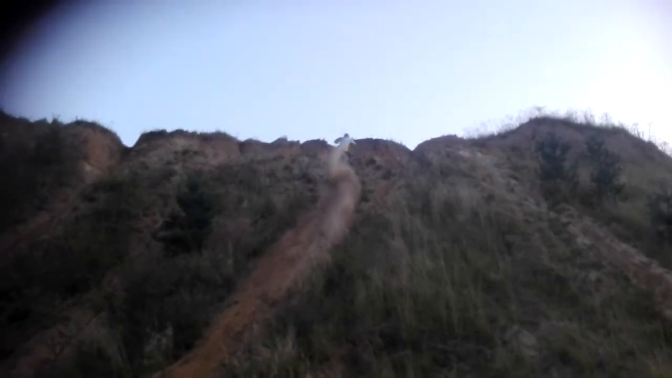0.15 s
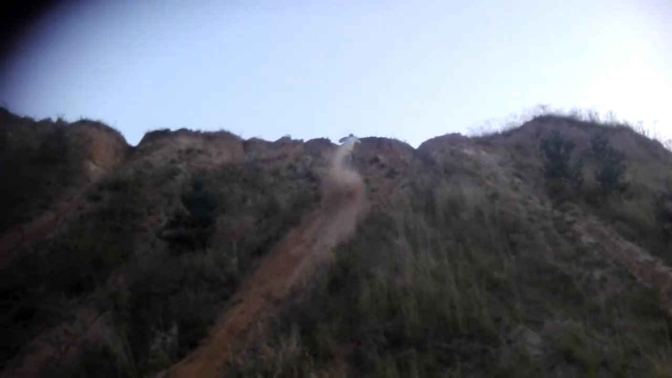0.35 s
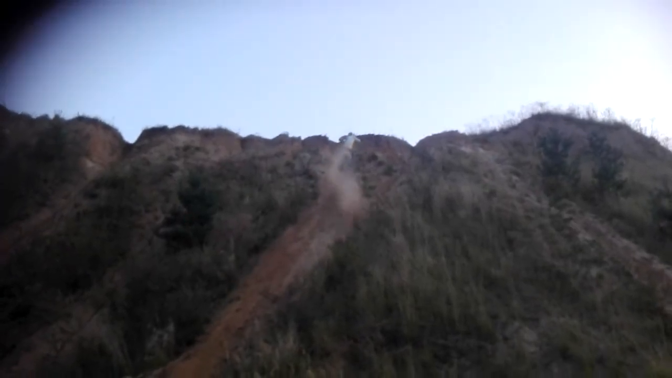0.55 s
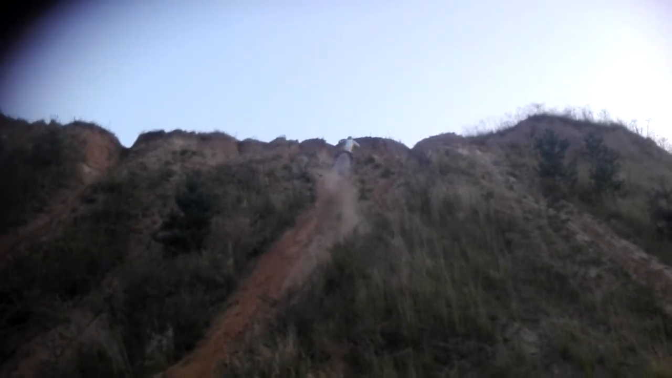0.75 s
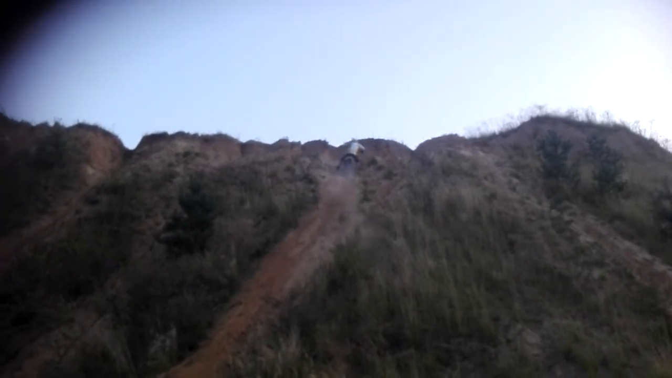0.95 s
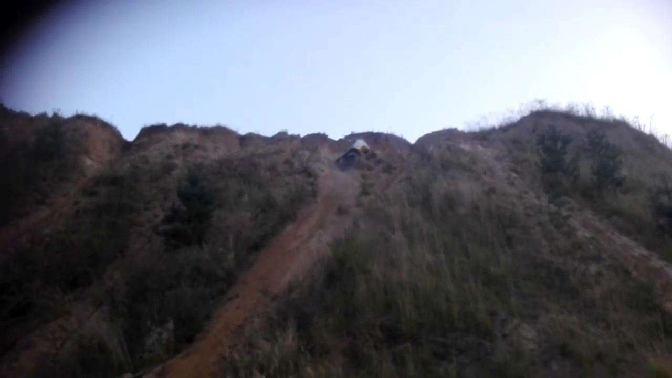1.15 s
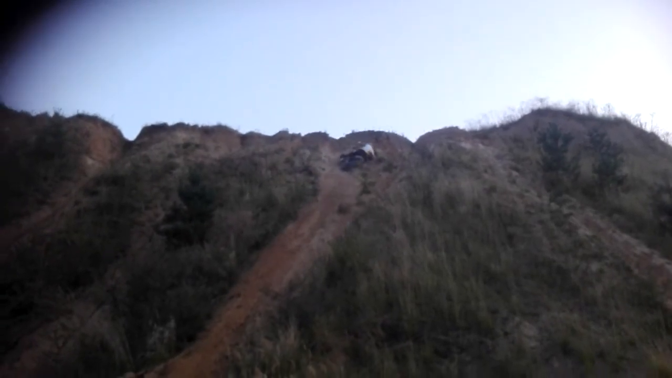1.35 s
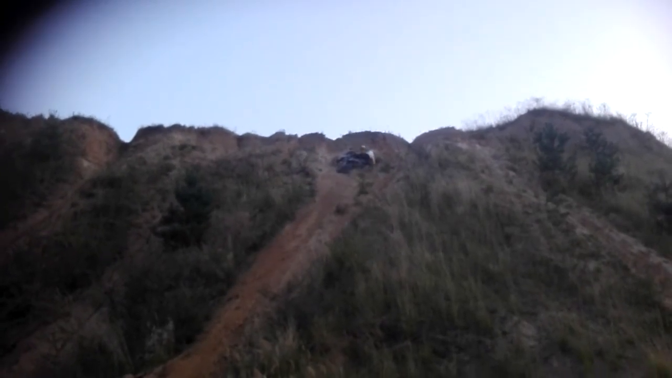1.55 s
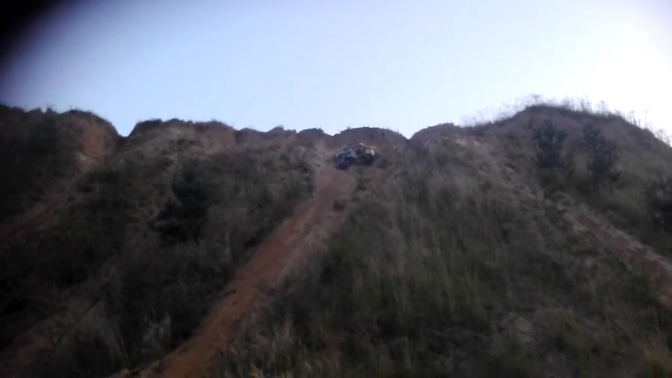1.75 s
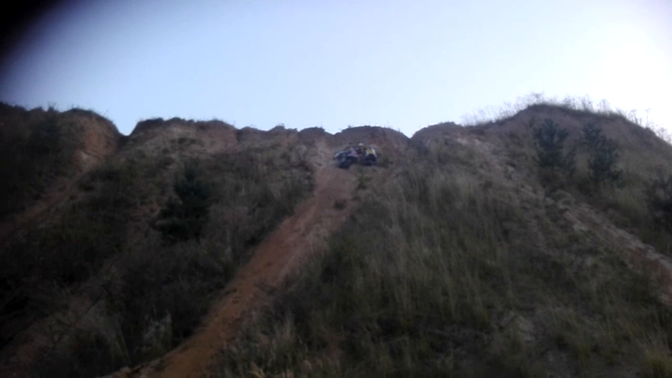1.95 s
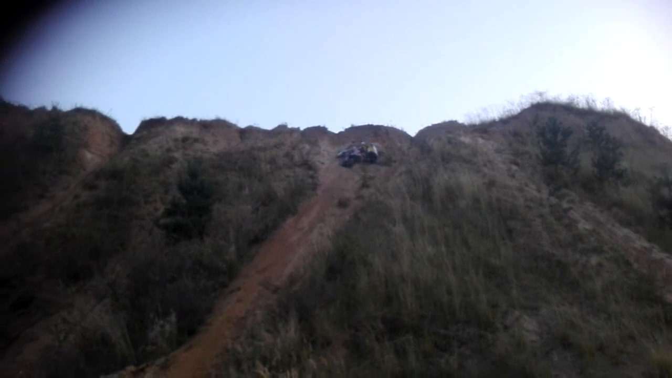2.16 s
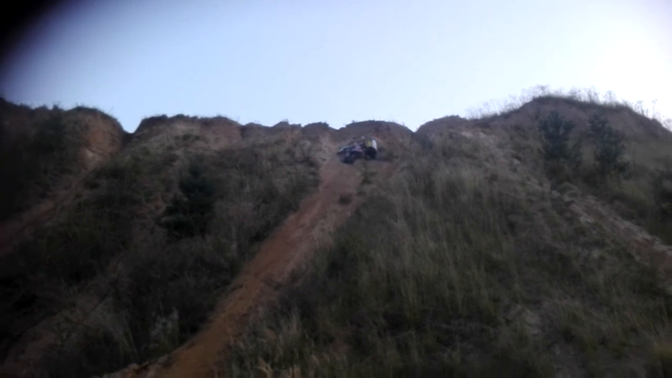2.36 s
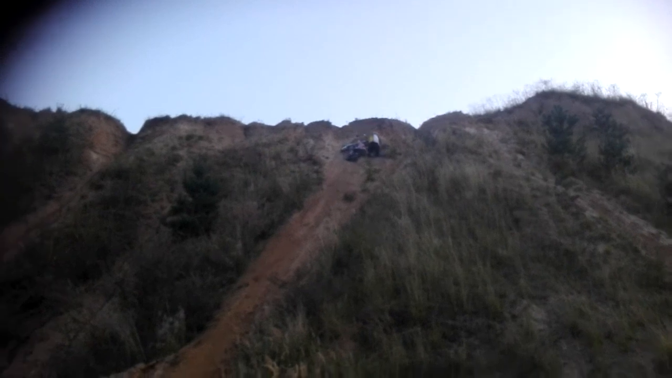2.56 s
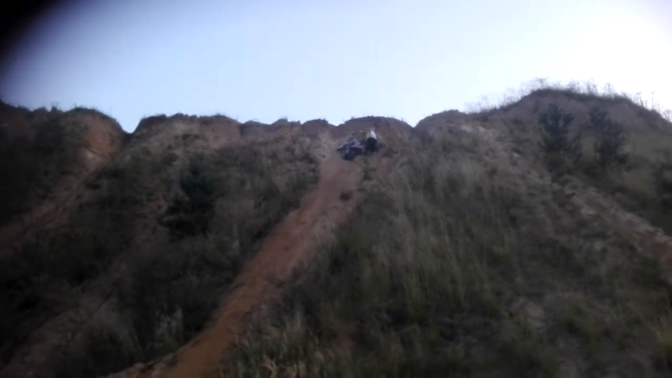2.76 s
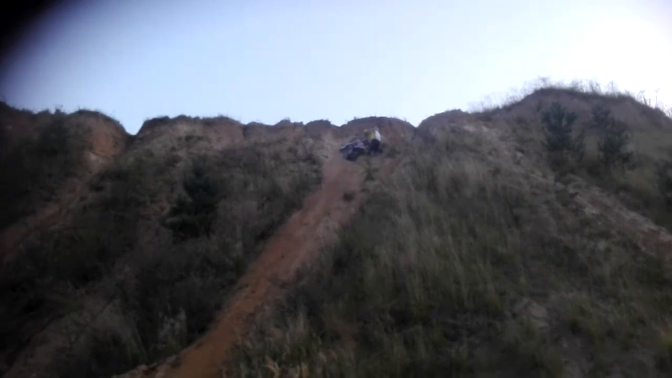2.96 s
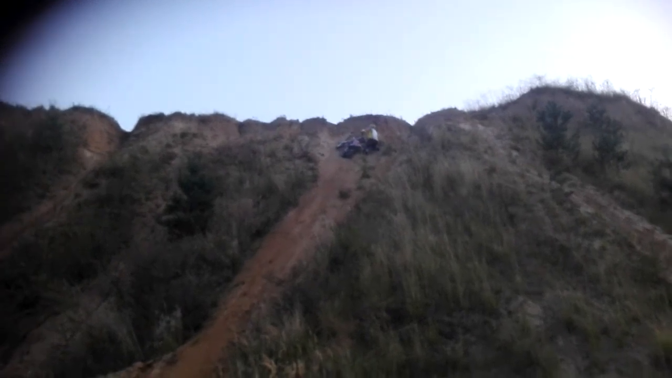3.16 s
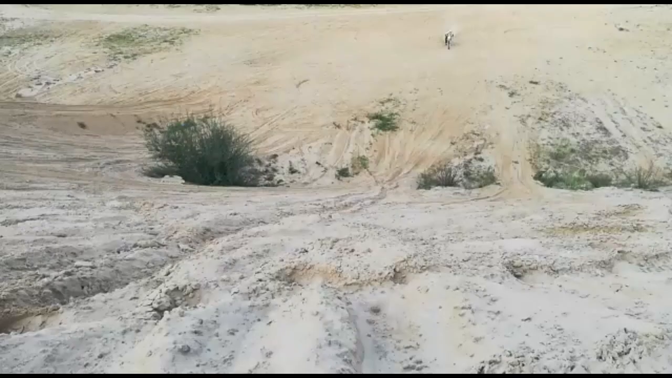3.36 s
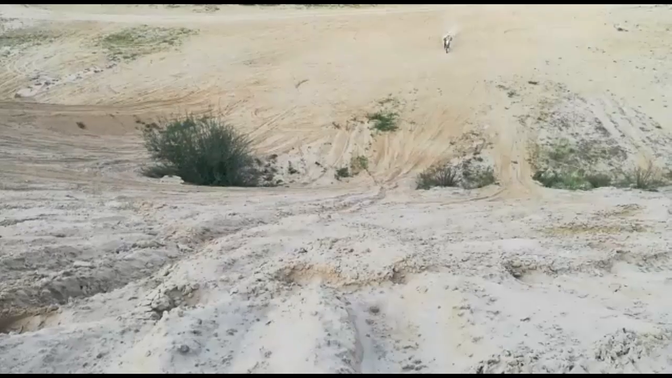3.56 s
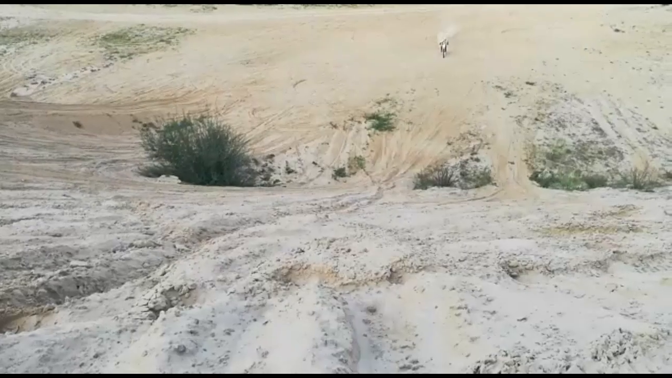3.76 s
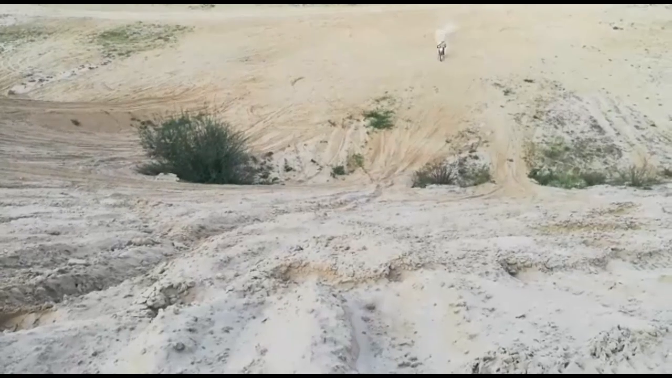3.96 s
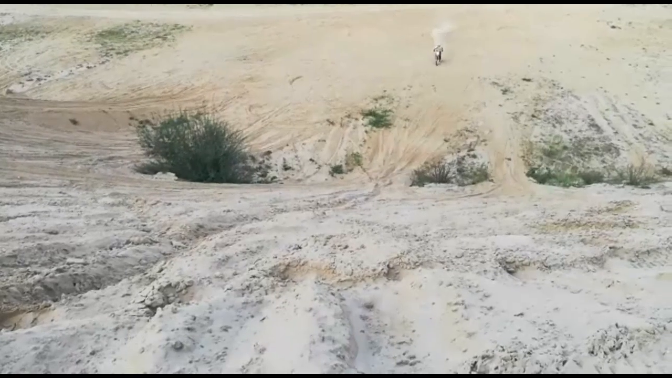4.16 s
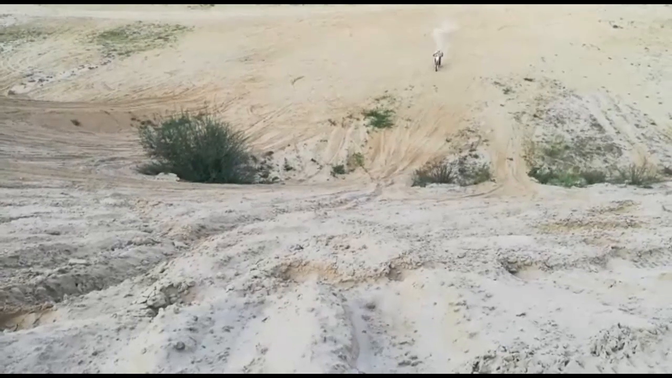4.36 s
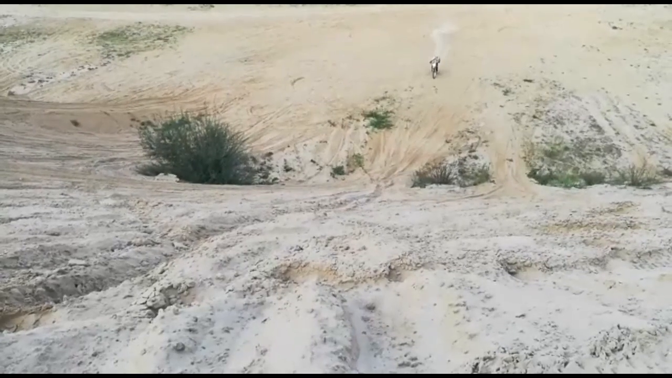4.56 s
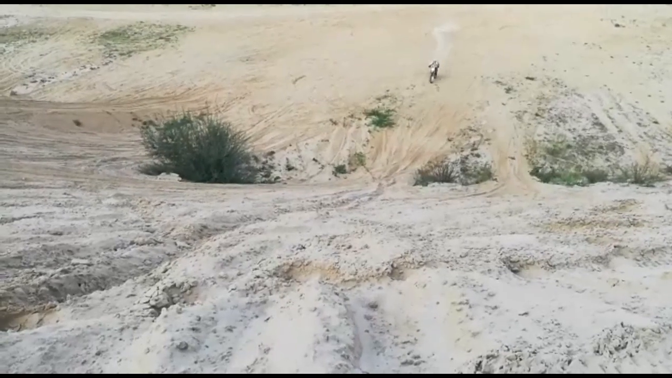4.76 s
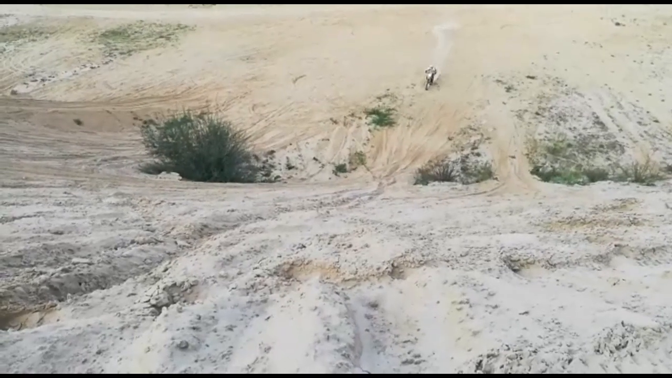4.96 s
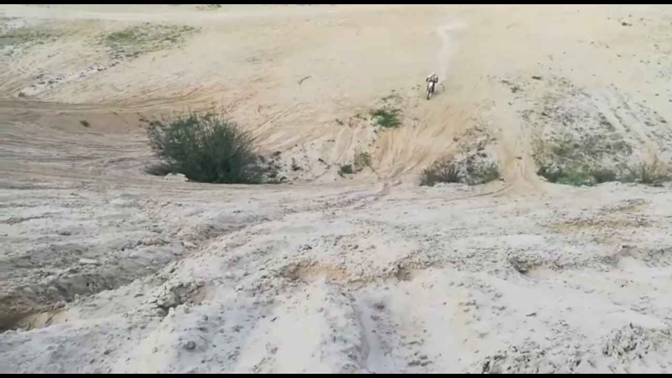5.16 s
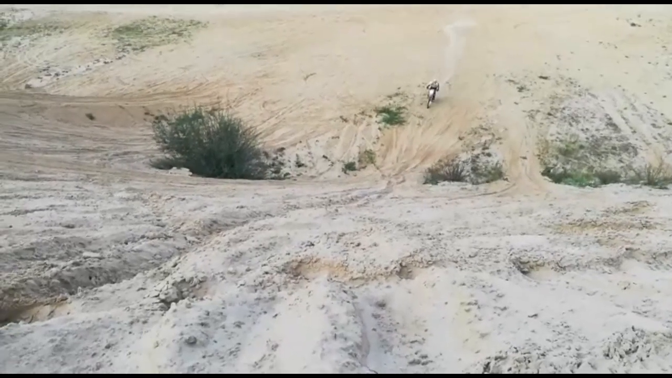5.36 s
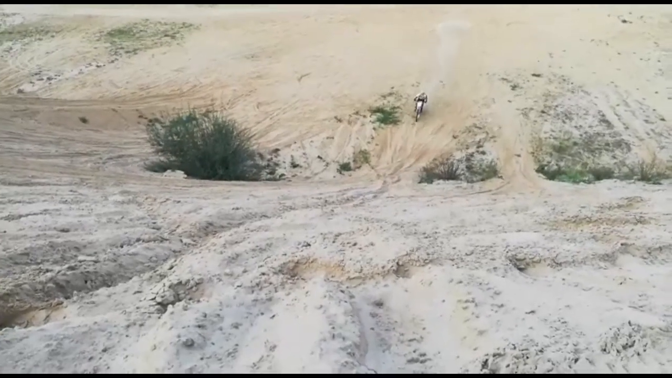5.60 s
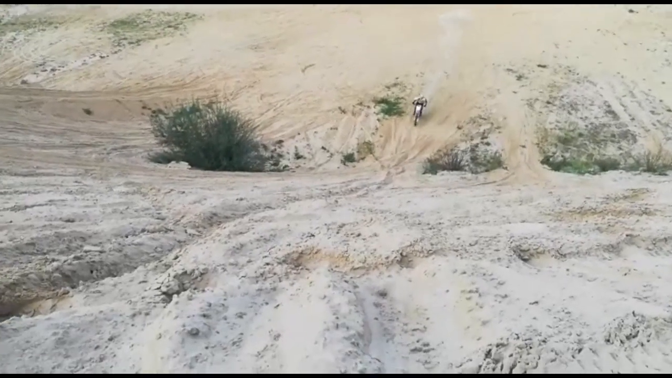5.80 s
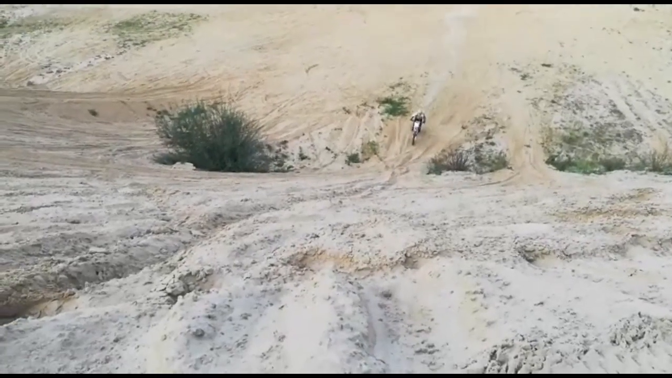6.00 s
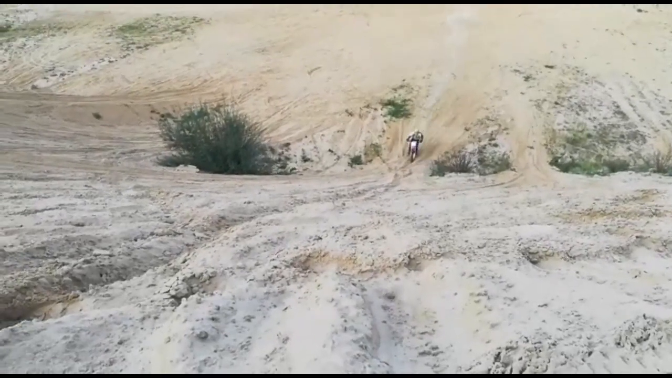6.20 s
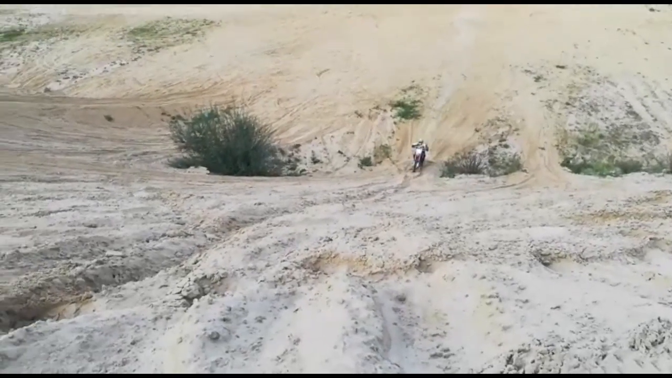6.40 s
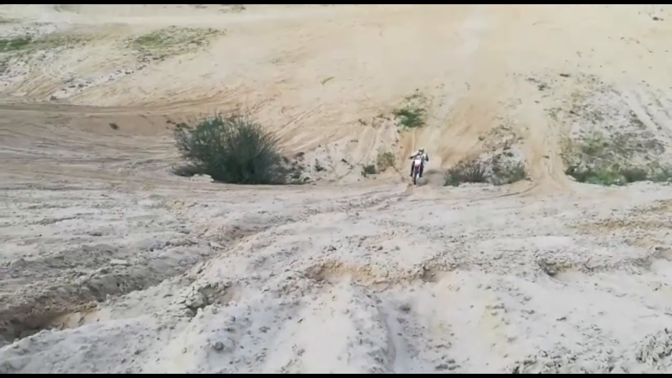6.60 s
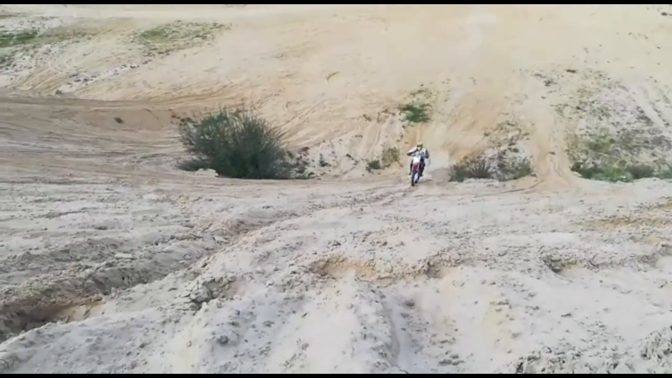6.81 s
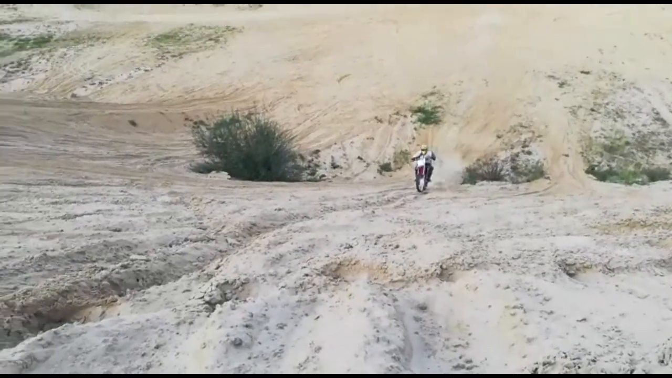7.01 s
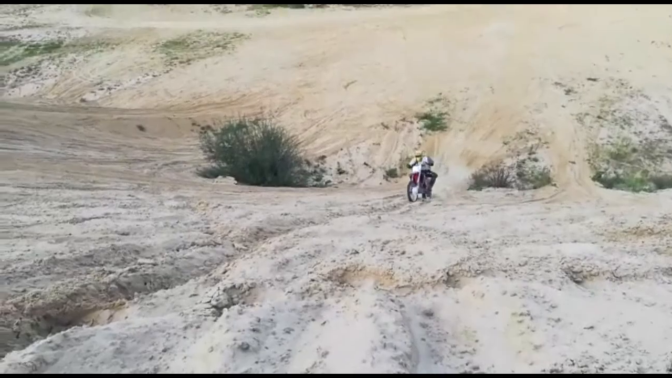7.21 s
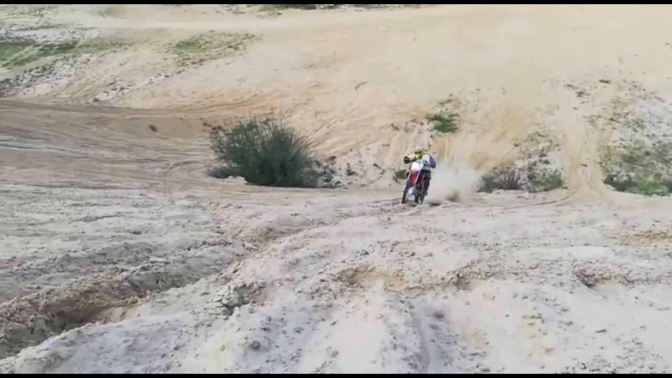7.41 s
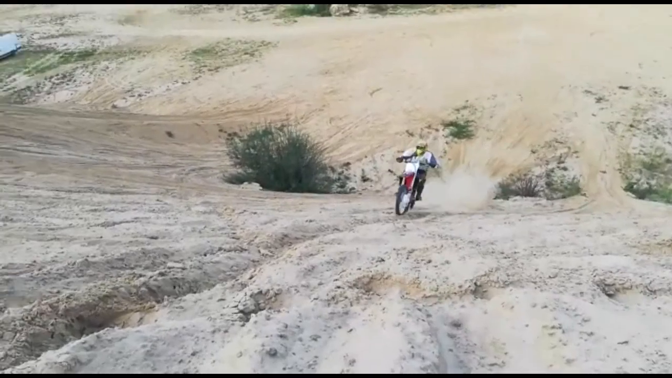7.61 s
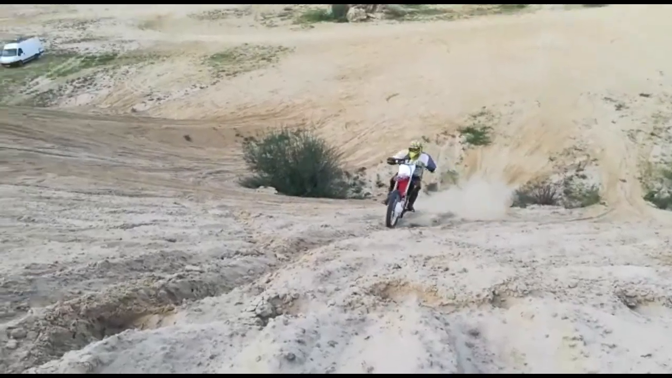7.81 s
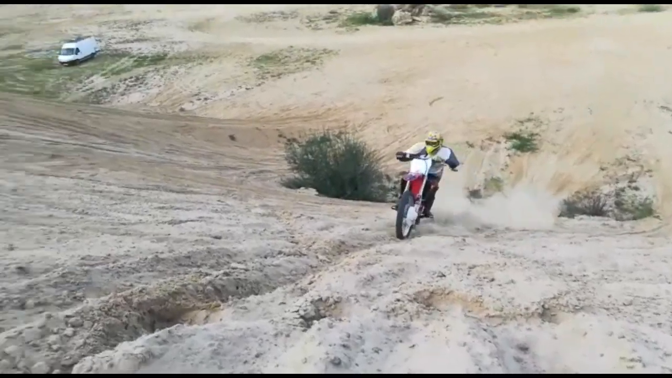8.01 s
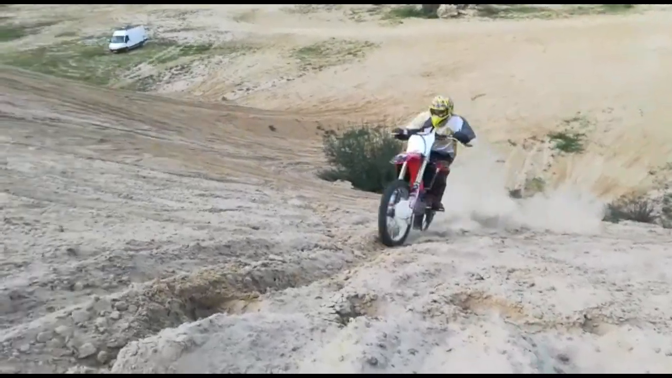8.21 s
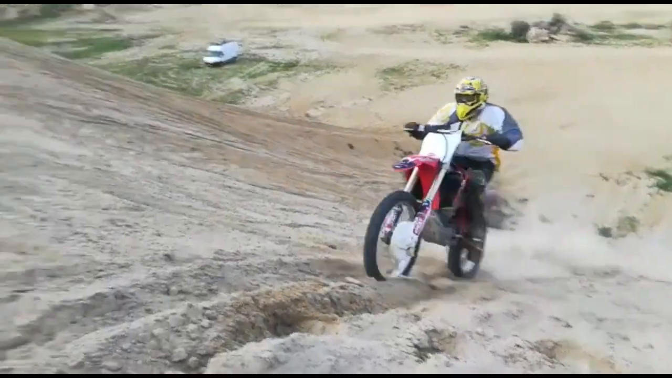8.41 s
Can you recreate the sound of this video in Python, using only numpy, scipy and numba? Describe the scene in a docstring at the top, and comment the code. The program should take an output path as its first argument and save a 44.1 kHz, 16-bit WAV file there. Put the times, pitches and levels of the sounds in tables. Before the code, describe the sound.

Outdoors on a sandy slope, a distant single-cylinder dirt bike quickly loses revs, with a few muffled pops and sand hiss, idles in uneven soft thumps and stalls. After half a second of silence, a second bike cuts in far off, droning, drops its throttle, then climbs towards a fixed microphone, briefly cuts again and flares into a loud, surging, clattering roar.

```python
"""First a far single-cylinder four-stroke dirt bike drops its revs, idles lumpily and stalls.
After a silent gap a second bike comes up a sand hill in surges, shutting its throttle twice on the way.
The far bike is clicks ringing a pipe, soft thumps, hum and filtered noise. The near one is sine waves for
the exhaust boom, filtered clicks and noise for its bark, clatter and sand, and close up a gear whine."""
import sys
import numpy as np
from scipy import signal
from scipy.fft import rfft, irfft
from scipy.io import wavfile
from scipy.ndimage import uniform_filter1d
from numba import njit

SR = 44100
rng = np.random.default_rng(int(sys.argv[2]) if len(sys.argv) > 2 else 0)


def put_to_file(sound):
    """Save the sound as 16-bit audio at rate SR, in the file named by the first command-line argument."""
    columns = np.atleast_2d(sound).T  # one column per channel
    safe = np.clip(columns, -1, 1)
    whole_steps = np.round(safe * 32767)
    wavfile.write(sys.argv[1], SR, whole_steps.astype(np.int16))


N = 372644

GAP_START_S, GAP_END_S = 3.108, 3.572  # silence between the two scenes
TOP_HZ = 15750  # nothing much is heard above this

# Far bike slowing down: (time [s], length of an engine cycle [ms])
FAR_CYCLE_LENGTH = [(0, 16.34), (.12, 19.76), (.4, 27.34), (.8, 35.33), (1.3, 42.83), (1.8, 51.28),
                    (2.75, 53.18), (3.1, 99.89)]
# Far bike: (time [s], thump level [dB], thump pitch [Hz], burn level [dB],
# hum level at the cycle rate [dB], hum level at the crank rate [dB])
FAR_ENGINE = [(0, -37.5, 176, -48, -36, -36.5), (.2, -37, 167, -40, -56, -55),
              (.36, -40.5, 132, -38.5, -51, -47), (.45, -39, 132, -48.5, -44, -54),
              (.6, -41, 135, -50, -63, -46), (.75, -45.5, 141, -66, -51, -43.5),
              (1.1, -48.5, 141, -54, -45.5, -43.5), (1.3, -44.5, 148, -51, -59, -44),
              (1.6, -48, 123, -44, -69, -49.5), (2.0, -48.5, 86, -43.5, -77, -51),
              (2.78, -45.5, 92, -44.5, -68, -59), (2.86, -44, 55, -49.5, -68.5, -51),
              (2.95, -46.5, 52.2, -72, -69, -55), (3.1, -65, 60, -61, -85.5, -62)]
# Pipe of the far bike: (frequency [Hz], level [dB])
FAR_PIPE = [(15, -10), (40, -9.5), (85, 2), (112, -10), (142, 3.5), (176, -6), (215, 0), (250, -13.5),
            (282, -37), (330, -12), (390, -29), (470, -54), (900, -84)]
# Far bike, strength of the click behind each cycle's tick, before filtering: (time [s], level [dB])
FAR_TICK = [(0, -23), (.15, -7.5), (.36, -10), (.45, -24), (.7, -31), (1.0, -45), (3.1, -64)]
# Exhaust cracks of the far bike: (time [s], peak level [dB], pitch [Hz])
FAR_CRACKS = [(0.189, -47, 937), (0.233, -34, 1080), (0.2554, -28, 2150), (0.3033, -42, 999),
              (0.3287, -43, 2500), (0.3531, -35.5, 2780), (0.4075, -42, 1550), (0.5527, -44, 1420),
              (0.5851, -47, 1050), (0.616, -43, 1210), (0.6495, -44, 1600)]
# Hiss of the far bike, first sand and then gas: (time [s], level [dB])
FAR_HISS = [(0, -47), (.12, -51.5), (.4, -56.5), (1.62, -63), (1.76, -68), (2.75, -71), (2.93, -74.5),
            (3.1, -83)]
# Sand running down the slope: (frequency [Hz], level [dB])
FAR_SAND_COLOUR = [(260, -22), (450, 4), (649, -11.5), (730, 1), (1130, 2), (2650, -2.5), (3200, 0),
                   (3900, -1.5), (5610, -4), (11500, -22), (15000, -23)]
# Bands that waver in the running sand: (centre [Hz], width [Hz], level [dB])
FAR_SAND_RINGS = [(1320, 100, -21), (3280, 200, -15.5)]
# Gas at idle: (frequency [Hz], level [dB])
IDLE_GAS_COLOUR = [(260, -41), (450, -9), (592, -7), (670, -13), (769, -5), (1490, -8), (1610, -3.5),
                   (2960, -10.5), (4050, -9), (4590, -10.5), (12000, -31.5), (15600, -59), (22000, -120)]
# Bands that stand out in the gas at idle: (centre [Hz], width [Hz], level [dB])
IDLE_GAS_RINGS = [(1570, 67, -16), (1810, 32, -18), (2810, 31, -17), (3390, 47, -15)]
SAND_STOPS_S = (1.69, 1.7)  # the sand hiss gives way to gas
MISFIRE_S, MISFIRE_DB = (1.12, 2.33), -15  # while every second burn is weak, and by how much
LOW_THUMP_HZ, LOW_THUMP_DB = 60, -7  # a second, lower ring in each thump, beside the first

# Climbing bike: (time [s], firing rate [Hz])
FIRING_RATE = [(3.57, 54.3), (3.73, 53.8), (3.94, 45.84), (4.03, 38.8), (4.1, 34.9), (4.18, 33),
               (4.32, 34.44), (4.38, 40.4), (4.43, 45), (4.82, 49.46), (5.01, 48.54), (5.1, 51), (5.24, 50),
               (5.42, 52.65), (5.74, 52.5), (5.8, 50.7), (5.87, 46.2), (5.95, 48.94), (6.03, 57.55),
               (6.18, 77.3), (6.21, 77.8), (6.3, 59.4), (6.35, 58.2), (6.44, 60.14), (6.6, 70.8),
               (6.67, 72.53), (6.8, 80.4), (6.86, 82.73), (6.9, 79.75), (7.06, 81.1), (7.17, 79.16),
               (7.25, 75.6), (7.33, 74.44), (7.47, 76.45), (7.6, 82.1), (7.67, 85.13), (7.73, 85.4),
               (7.86, 77.75), (7.96, 74.7), (8.04, 77), (8.11, 83.27), (8.16, 79.74), (8.28, 88.9),
               (8.45, 92.8)]
# Climbing bike drawing near, throttle open:
# (time [s], exhaust boom [dB], bark [dB], clatter [dB], sand [dB])
APPROACH = [(3.57, -31.5, -38.5, -41, -45), (3.73, -32.5, -42.5, -45, -47.5), (3.95, -35.5, -46, -48, -51),
            (4.4, -34, -42, -45, -50), (4.5, -32.5, -36.5, -39, -45), (4.65, -33, -38.5, -39, -43.5),
            (5.25, -31.5, -37, -41.5, -42), (5.33, -32, -38.5, -35, -52.5), (5.75, -31, -36, -32.5, -49),
            (5.88, -28.5, -36, -30, -47.5), (5.96, -27.5, -35, -29, -49), (6.04, -19.5, -27, -26, -43),
            (6.16, -25, -30.5, -25, -38), (6.25, -22, -32, -24.5, -38.5), (6.31, -28, -34, -26, -38.5),
            (6.44, -23.5, -47, -24.5, -39), (6.8, -19.5, -35.5, -22.5, -35), (7.3, -20, -36, -22, -30),
            (7.55, -19, -30, -22.5, -31.5), (7.74, -16.5, -29, -23, -29.5), (7.95, -15.5, -25, -21.5, -33),
            (8.3, -13, -26, -20.5, -26.5), (8.45, -11.5, -34, -16.5, -27.5)]
CREST_S = (5.85, 6.1)  # the bike comes over a rise into full view
# Share of an exhaust order by its pitch, down the slope: (frequency [Hz], level [dB])
BOOM_FAR = [(40, -10), (53, -3.5), (92, 1.5), (110, 0), (135, -12.5), (150, -20), (162, -13), (182, -4.5),
            (200, -17), (220, -10), (245, -13.5), (265, -27.5)]
# The same close up: (frequency [Hz], level [dB])
BOOM_NEAR = [(58, -19), (72, -18.5), (82, -12.5), (92, -13.5), (118, 6), (160, -1), (176, -2), (210, -8),
             (240, -8), (265, -11), (290, -24), (325, -25), (370, -34.5), (460, -35.5)]
# The same with the throttle shut: (frequency [Hz], level [dB])
BOOM_SHUT = [(34, -26), (47, -22), (68, -3.5), (95, -11), (110, -8.5), (140, -2.5), (165, -13),
             (190, -18.5), (240, -31)]
# The boom dips briefly: (time [s], depth [dB])
BOOM_DIPS = [(5.78, -12), (5.925, -7), (6.203, -8)]
DIP_S = 0.027  # width of a dip at half its depth
# Order k gains BRIGHTEN * (k - 2) dB for each dB of boom above the given level
BRIGHTEN, BRIGHT_FROM_DB = 0.55, -19.5
# The throttle shuts: (start [s], end [s], extra level of the first thumps [dB])
LIFTS = [(3.998, 4.369, 7.5), (5.816, 5.895, 9)]
OVERRUN_S, LUMPY_DB = 0.089, 4  # how long those louder thumps last; how uneven the later ones are
SHUT_OPENING = .15  # throttle opening left when shut
SHUT_DB = (-8.5, -5.5, -7.5)  # change of bark, clatter and sand, times the share of opening lost
WHEELSPIN_S, WHEELSPIN_DB = (5.94, 6.2), (-12, 0.5, -16, -28.5, -34)  # revs flare; orders 1 to 5
SPELL_EDGE_S = 0.041  # how long lifts and wheelspin take to come and go

# Bark close up: (frequency [Hz], level [dB])
BARK_NEAR = [(160, -71), (280, 6), (350, -7), (474, -11), (602, -14.5), (886, -13), (1090, 0), (1260, -8),
             (1370, 1.5), (1660, -3.5), (2000, -10), (2600, -15.5), (4400, -120)]
# Bark down the slope: (frequency [Hz], level [dB])
BARK_FAR = [(140, -33), (230, 0.5), (321, -11), (548, -5.5), (606, 0.5), (713, -4.5), (802, 0.5),
            (1430, -5), (1640, -14), (1830, -4), (2600, -26.5), (4400, -120)]
COAST_HZ, COAST_DB = 846, 0  # a band of gas added to the bark as the throttle shuts
# Engine clatter close up: (frequency [Hz], level [dB])
CLATTER_NEAR = [(710, -13.5), (1200, 3), (1270, -7), (1400, -8), (1550, 5), (1690, -2), (2000, 4.5),
                (2160, -1), (2400, 8.5), (2710, -2), (3070, 1), (3780, 6), (5100, -3.5), (6350, -4),
                (6900, -35), (11400, -120)]
# Engine clatter down the slope: (frequency [Hz], level [dB])
CLATTER_FAR = [(710, -15.5), (1200, -1), (1430, -1), (1640, -10), (1820, -2.5), (2080, -21), (2440, -4.5),
               (2710, -9), (3010, -3), (3530, -6), (4200, -13.5), (4710, -11), (5200, -12.5), (6600, -19.5),
               (8200, -50), (11400, -120)]
# Rings of the engine casing, against each other: (centre [Hz], width [Hz], level [dB])
CASING = [(1825, 8.3, -7.5), (2038, 11, -1.5), (2393, 66, -3.5)]
# Three rings in the clatter whose pitch and level wander, the lowest: (time [s], pitch [Hz], level [dB])
LOW_RING = [(5.95, 1200, -8), (6.05, 1410, -20), (6.19, 1130, -10.5), (6.3, 1410, -11), (6.69, 1420, -11.5),
            (6.9, 1369, -14.5), (7.3, 1439, -14.5), (7.4, 1478, -13), (7.82, 1382, -17), (7.97, 1516, -6),
            (8.25, 1420, -14.5), (8.4, 1351, -9.5)]
# The middle one: (time [s], pitch [Hz], level [dB])
HIGH_RING = [(5.95, 1800, -12), (6.3, 1900, -40), (6.6, 2300, -29), (7.2, 2140, -33), (7.29, 2060, -23),
             (7.36, 2430, -18), (7.62, 2374, -22), (7.9, 2200, -22), (8.22, 2210, -8), (8.27, 1980, -8),
             (8.44, 1993, -9)]
# The highest: (time [s], pitch [Hz], level [dB])
TOP_RING = [(6.1, 3500, -20), (6.22, 3579, -31), (7.2, 3890, -20), (7.8, 3666, -17), (8.28, 4033, -13),
            (8.45, 4403, -11)]
RING_WIDTH_HZ = 120
# Sand off the tyre: (frequency [Hz], level [dB])
SAND_COLOUR = [(2470, -22), (4200, -6.5), (4950, -2.5), (5650, 3), (6630, 6), (7520, 2), (9120, -4.5),
               (10000, -15.5), (11300, -26), (14600, -35), (15600, -42)]
# Stone clicks: (time [s], peak level [dB], pitch [Hz])
STONES = [(5.1484, -20, 5860)]
# Band cancelled by the sound off the ground: (time [s], centre [Hz], depth [0 to 1])
GROUND_NOTCH = [(3.57, 2420, 0.37), (4.4, 2150, 0.3), (5.2, 2200, 0.34), (5.27, 2700, 0.74),
                (5.7, 2820, 0.94), (5.95, 2685, 0.93), (6.4, 2930, 0.7), (7.4, 3020, 0.17),
                (8.1, 2940, 0.18)]
NOTCH_WIDTH_HZ = 1200

# Climbing bike in full view: (time [s], upper orders [dB], gear whine [dB], crack in each cycle [dB])
CLOSE = [(5.9, -63, -69, -59), (6.0, -48, -58, -40), (6.16, -40, -34, -49.5), (6.29, -54, -42, -39),
         (6.4, -53, -55, -31.5), (6.62, -45.5, -52, -45), (6.8, -50, -38, -46), (7.1, -46, -36, -54),
         (7.22, -69, -39, -33), (7.3, -52, -56, -28), (7.48, -40.5, -56, -29.5), (7.58, -40, -32.5, -31),
         (7.75, -41, -32.5, -34.5), (7.95, -32, -39, -29.5), (8.2, -32, -40, -27.5),
         (8.45, -31.5, -43, -30)]
# Clean exhaust orders above the boom: (multiple of the firing rate, level [dB])
UPPER_ORDERS = [(6, -10.5), (7, -9.5), (9, -7.5), (10, -8), (11, -6.5), (12, -1.5), (13, -5.5), (14, -10.5)]
GEAR_TEETH = 17  # gear meshes per firing
# Neighbouring whines under load: (meshes per firing, level [dB])
SIDE_WHINES = [(18, -1), (22, -3)]
SIDE_WHINES_S = (7.45, 7.82)  # while they sound
CRACK_HZ, CRACK_WIDTH_HZ = 2140, 652  # middle pitch of the cracks; width of the first of two filters


def undb(db):
    """Decibels to a plain factor."""
    return np.exp(np.asarray(db) * np.log(10) / 20)


def level(x, db):
    """Scale a sound to a chosen average (RMS) level."""
    return x * undb(db) / np.sqrt(np.mean(x ** 2))


def columns(table):
    """Every column of a curve table, one value per sample."""
    times, *curves = np.transpose(table)
    return [np.interp(np.arange(N) / SR, times, curve) for curve in curves]


def span(start_s, end_s, edge_s):
    """1 between two times, 0 outside, sloping through one half at each."""
    t = np.arange(N) / SR
    return np.clip(np.minimum(t - start_s, end_s - t) / edge_s + .5, 0, 1)


def walk(rate):
    """Random levels, rate a second, joined smoothly; spread near 1."""
    place = np.arange(N) * rate / SR
    levels = rng.standard_normal(int(place[-1]) + 2)
    index, slide = place.astype(int), place % 1
    return levels[index] + np.diff(levels)[index] * slide ** 2 * (3 - 2 * slide)


@njit
def svf(x, hz, width):
    """State-variable band-pass with a moving centre and width, gain 1 at the centre."""
    y, b, l = np.empty(len(x)), 0., 0.
    for i in range(len(x)):
        g, k = np.tan(np.pi * hz[i] / SR), width[i] / hz[i]
        v = (b + g * (x[i] + 1e-18 - l)) / (1 + g * (g + k))
        b, l, y[i] = 2 * v - b, l + 2 * g * v, k * v
    return y


def band(x, hz, width_hz):
    """The band-pass for fixed or moving settings."""
    return svf(x, hz + 0 * x, width_hz + 0 * x)


def colour(x, points):
    """Filter through (Hz, dB) points without ringing ahead of time, from the folded cepstrum."""
    size = 2 ** 13
    hz, db = np.transpose(points)
    grid_hz = np.arange(size + 1) * SR / 2 / size
    cep = irfft(np.log(undb(np.interp(np.log(grid_hz + 1), np.log(hz), db))))
    cep[1:size] *= 2
    cep[size + 1:] = 0
    return signal.fftconvolve(x, irfft(np.exp(rfft(cep)))[:size])[:N]


def rings(x, table):
    """A sound plus narrow bands of it that drift and swell."""
    out = x
    for hz, width, db in table:
        ring = band(x, hz * (1 + 0.017 * walk(3.3)), width)
        out = out + undb(db + 2.7 * walk(4.26)) * level(ring, 0)
    return out


def ticks(events, ring_s, q):
    """Short damped noisy rings."""
    out, t = np.zeros(N), np.arange(int(.02 * SR)) / SR
    for s, db, hz in events:
        ring = band(rng.standard_normal(len(t)) * np.exp(-t / ring_s), hz, hz / q)
        ring = band(ring, hz, hz / q)
        out[int(s * SR):int(s * SR) + len(t)] += undb(db) * ring / np.abs(ring).max()
    return out


def firings(cycles):
    """A unit click where each cycle begins, split over two samples."""
    clicks = np.zeros(N)
    at = np.interp(np.arange(1, int(cycles[-2])), cycles, np.arange(N))
    clicks[at.astype(int)] = 1 - at % 1
    clicks[at.astype(int) + 1] = at % 1
    return clicks


def puffs(cycles, share, fall):
    """Noise of which a share swells and dies as a puff in every cycle."""
    phase = cycles % 1
    puff = (1 - np.exp(-phase / 0.091)) * np.exp(-phase / fall)
    return rng.standard_normal(N) * (1 - share + share * puff)


def far_hiss(cycles, skip_db):
    """Grains of sand running down the slope, then gas puffing once a cycle at idle."""
    (hiss_db,) = columns(FAR_HISS)
    grit = puffs(cycles, .5, .45) * undb(2 * rng.exponential(size=N))
    sand = rings(level(colour(grit, FAR_SAND_COLOUR), 0), FAR_SAND_RINGS)
    gas = rings(level(colour(puffs(cycles, .85, .35), IDLE_GAS_COLOUR), 0), IDLE_GAS_RINGS)
    gas = gas * undb(.12 * skip_db * (np.floor(cycles) % 2 == 0))
    still = np.interp(np.arange(N) / SR, SAND_STOPS_S, (0, 1))
    return ((1 - still) * sand + still * gas) * undb(hiss_db + .6 * walk(20))


def far_thumps(clicks, ring_hz, pump_luck, burn_luck):
    """Each cycle pumps a soft push of air that rings at a low pitch and a lower second one."""
    push = np.convolve(clicks * undb(1.8 * pump_luck), np.hanning(SR // 200), "same")
    soft = band(push, ring_hz * (1 + .06 * burn_luck), 130.)
    pump = level(band(soft, ring_hz, 24) + undb(-11) * band(soft, ring_hz, 130), 0)
    low = band(band(push, LOW_THUMP_HZ, 30), LOW_THUMP_HZ, 59.5)
    return level(pump + level(low, LOW_THUMP_DB), 0)


def far_bike():
    """Each cycle pumps a thump and a burn rings the whole pipe; for a spell every second burn is weak."""
    (cycle_ms,), (tick_db,) = columns(FAR_CYCLE_LENGTH), columns(FAR_TICK)
    pump_db, ring_hz, burn_db, cycle_db, turn_db = columns(FAR_ENGINE)
    cycles = np.cumsum(1000 / cycle_ms) / SR
    skip_db = MISFIRE_DB * span(*MISFIRE_S, 0.14)
    whole = np.floor(cycles + .5).astype(int)
    pump_luck, burn_luck = rng.standard_normal((N // 200, 2))[whole].T
    clicks = firings(cycles)
    thumps = far_thumps(clicks, ring_hz, pump_luck, burn_luck)
    burns = clicks * undb(burn_luck + skip_db * (whole % 2 == 0))
    pipe = -level(colour(burns, FAR_PIPE), 0)
    tick = band(band(clicks * undb(tick_db + 2.4 * burn_luck), 750, 898), 750, 881)
    cracks = ticks(FAR_CRACKS, .0017, .9) + tick
    # the crank turns twice a cycle
    hum = undb(cycle_db) * np.sin(2 * np.pi * cycles) + undb(turn_db) * np.sin(4 * np.pi * cycles)
    engine = undb(pump_db) * thumps + undb(burn_db) * pipe + np.sqrt(2) * hum
    return engine + far_hiss(cycles, skip_db) + cracks


def low_rumble():
    """Low filtered noise that lies under the exhaust boom."""
    points = [(15, -14), (30, -4), (200, 14.0), (400, -32.0)]  # (frequency [Hz], level [dB])
    return level(colour(rng.standard_normal(N), points), -21.0)


def tyre_sand():
    """Sand off the tyre: noise grains of uneven size, filtered to a hiss."""
    grains = rng.standard_normal(N) * undb(2.0 * rng.exponential(size=N))
    return level(colour(grains, SAND_COLOUR), 0) * undb(1.5 * walk(22))


def engine_clatter(cycles, size, clicks, near):
    """Noise puffs and firing clicks shake the engine, ringing its casing in narrow bands."""
    rattle = level(puffs(cycles, .4, .35) * size, 0) + .45 * clicks
    knock = band(rattle + clicks, 3820, 3485)
    casing = 0
    for hz, width, db in CASING:
        casing = casing + undb(db + 3 * walk(3)) * band(knock, hz * (1 + .012 * walk(2)), width)
    close = level(colour(rattle, CLATTER_NEAR), -2) + level(casing, -7)
    for table in (LOW_RING, HIGH_RING, TOP_RING):
        ring_hz, ring_db = columns(table)
        ring = level(band(rattle + 0.46 * clicks, ring_hz, RING_WIDTH_HZ), 0)
        close = close + undb(ring_db + 2.0 * walk(15)) * ring
    return near * close + (1 - near) * level(colour(rattle, CLATTER_FAR), 0)


def rasp(clicks, spread_s):
    """Each firing is smeared by the pipe's echoes, every pitch with its own lag; the smear changes slowly."""
    size, turn = 2048, walk(3)
    lags = spread_s * uniform_filter1d(rng.random((2, size // 2 + 1)), size=6) ** 2 * 3
    shapes = irfft(np.exp(-2j * np.pi * np.cumsum(lags, axis=1) * SR / size))
    one, two = (signal.fftconvolve(clicks, shape)[:N] for shape in shapes)
    return level(np.cos(turn) * one + np.sin(turn) * two, 0)


def exhaust_bark(cycles, clicks, near, throttle):
    """Sharp firings and rushing gas, coloured by the exhaust."""
    gas = level(puffs(cycles, 0.094, 0.97), 0)
    # close up the firings stand clear of the gas rush; down the slope they blur into it
    bark_near = level(colour(clicks + undb(-10) * gas, BARK_NEAR), 0)
    bark_far = level(colour(clicks + undb(-1) * gas, BARK_FAR), 0)
    coasting = level(band(gas, COAST_HZ, RING_WIDTH_HZ), COAST_DB)
    return near * bark_near + (1 - near) * bark_far + (1 - throttle) * coasting


def off_ground(x):
    """The sound off the ground cancels a narrow band and, less, its octave."""
    notch_hz, depth = columns(GROUND_NOTCH)
    octave = band(x, 2 * notch_hz, 2 * NOTCH_WIDTH_HZ)
    return x - depth * (band(x, notch_hz, NOTCH_WIDTH_HZ) + 0.11 * octave)


def exhaust_orders(hz, boom_db, near):
    """Level of each low order from its pitch, recoloured by lifts and wheelspin; also the throttle opening."""
    order = np.arange(1, 6)[:, None]

    def share(points):
        """Level of every order at its present pitch."""
        points_hz, points_db = np.transpose(points)
        return np.interp(np.log(order * hz), np.log(points_hz), points_db)

    bright_db = BRIGHTEN * np.maximum(boom_db - BRIGHT_FROM_DB, 0) * (order - 2)
    order_db = near * (share(BOOM_NEAR) + bright_db) + (1 - near) * share(BOOM_FAR)
    order_db += span(*WHEELSPIN_S, SPELL_EDGE_S) * (np.array(WHEELSPIN_DB)[:, None] - order_db)
    throttle = np.ones(N)
    lumps_db = LUMPY_DB * walk(35)
    for start_s, end_s, first_db in LIFTS:
        shut = span(start_s, end_s, SPELL_EDGE_S)
        first = span(start_s, start_s + OVERRUN_S, SPELL_EDGE_S)
        shut_db = share(BOOM_SHUT) + first * first_db + (1 - first) * lumps_db
        order_db += shut * (shut_db - order_db)
        throttle -= shut * (1 - SHUT_OPENING)
    dips_db = sum(db * span(s - DIP_S / 2, s + DIP_S / 2, DIP_S) for s, db in BOOM_DIPS)
    return boom_db + dips_db + order_db, throttle


def exhaust_boom(cycles, order_db):
    """Sine waves at one to five times the firing rate, each wavering in level."""
    boom = 0
    for order, db in enumerate(order_db, start=1):
        wave = np.cos(2 * np.pi * order * cycles - .8)
        boom = boom + np.sqrt(2) * undb(db + 1.47 * walk(25)) * wave
    return boom


def close_engine(cycles):
    """In full view: clean upper orders, a gear whine and a short crack in every cycle."""
    upper_db, whine_db, crack_db = columns(CLOSE)
    upper = 0
    for order, db in UPPER_ORDERS:
        upper = upper + undb(db + 1.0 * walk(7)) * np.cos(2 * np.pi * order * cycles + order ** 2)
    whine = undb(1.53 * walk(12)) * np.cos(2 * np.pi * GEAR_TEETH * cycles)
    loaded = span(*SIDE_WHINES_S, .1)
    for count, db in SIDE_WHINES:
        whine += loaded * undb(db + 2.7 * walk(24)) * np.cos(2 * np.pi * count * cycles)
    size_luck, pitch_luck = rng.standard_normal((N // 200, 2))[cycles.astype(int)].T
    crack_hz = CRACK_HZ * (1 + .04 * walk(9) + .03 * pitch_luck)
    snap = firings(cycles + .5) * undb(1.5 * size_luck)  # halfway between the firing clicks
    crack = band(band(snap, crack_hz, CRACK_WIDTH_HZ), crack_hz, 2 * CRACK_WIDTH_HZ)
    tones = np.sqrt(2) * (undb(upper_db) * upper + undb(whine_db) * whine)
    return tones + undb(crack_db) * level(crack, 0)


def climbing_bike():
    """Each firing drives the boom, bark and clatter together; sand, stones and rumble join them."""
    (hz,), (boom_db, *treble_db) = columns(FIRING_RATE), columns(APPROACH)
    near = np.interp(np.arange(N) / SR, CREST_S, (0, 1))
    order_db, throttle = exhaust_orders(hz, boom_db, near)
    bark_db, clatter_db, sand_db = treble_db + np.array(SHUT_DB)[:, None] * (1 - throttle)
    cycles = np.cumsum(hz * (1 + .001 * walk(30))) / SR
    size = undb(rng.standard_normal(N // 200)[cycles.astype(int)])  # every burn is a little different
    clicks = rasp(firings(cycles) * size ** .5 * throttle, .006)
    treble = undb(bark_db) * exhaust_bark(cycles, clicks, near, throttle)
    treble += undb(clatter_db) * engine_clatter(cycles, size, clicks, near)
    treble += undb(sand_db) * tyre_sand()
    rumble = undb(order_db[1]) * low_rumble()  # follows the second order
    out = exhaust_boom(cycles, order_db) + off_ground(treble) + rumble
    return out + ticks(STONES, .001, 1.8) + near * close_engine(cycles)


def scene():
    """Two scenes with silence between; the second cuts in on a microphone offset that jumps down and dies away."""
    t = np.arange(N) / SR
    offset = -undb(-21.5) * np.exp(-np.abs(t - GAP_END_S) / 0.043)
    first = far_bike() * (t < GAP_START_S)
    second = (climbing_bike() + offset) * (t > GAP_END_S)
    return (first + second)[None]


def record(dry):
    """Round the loudest peaks and cut the top of the treble."""
    low_pass = signal.ellip(8, .2, 70, TOP_HZ, fs=SR, output="sos")
    return signal.sosfilt(low_pass, np.tanh(dry))


dry = scene()
out = record(dry)
put_to_file(out)
```